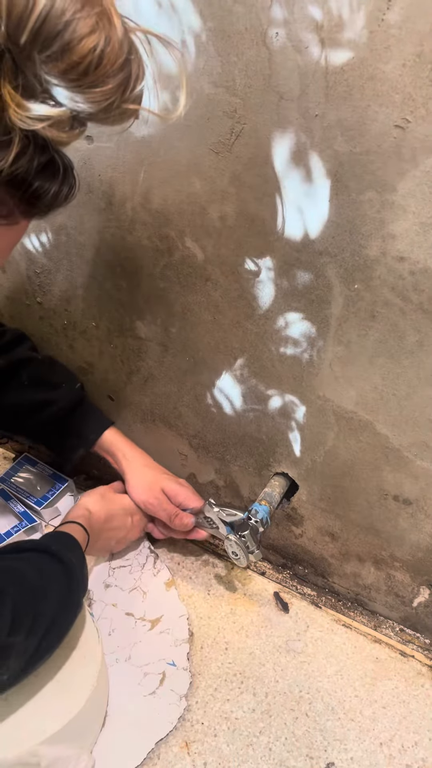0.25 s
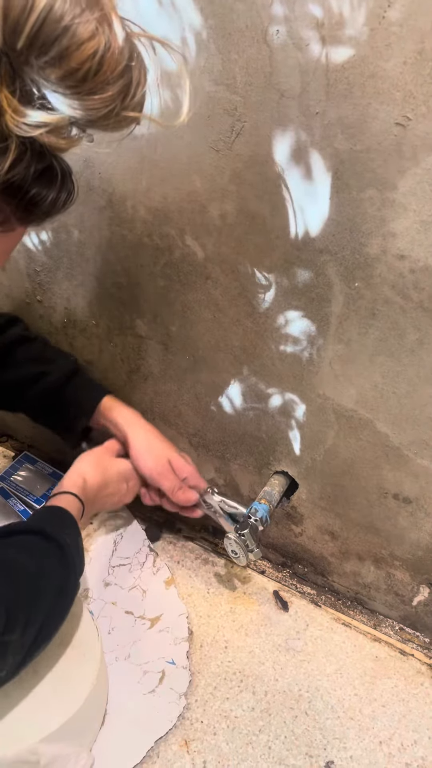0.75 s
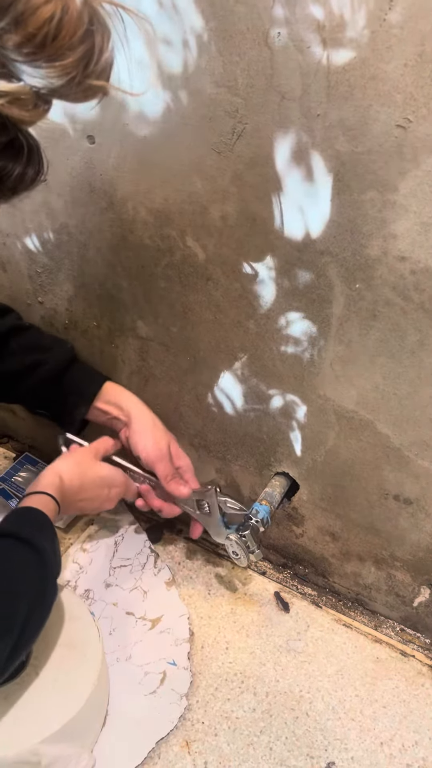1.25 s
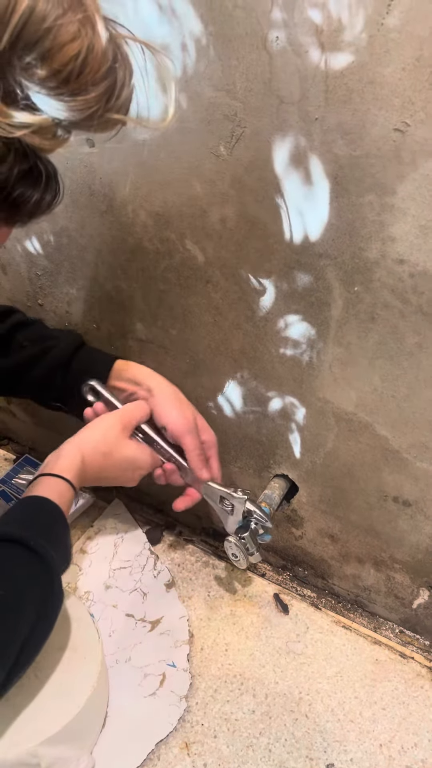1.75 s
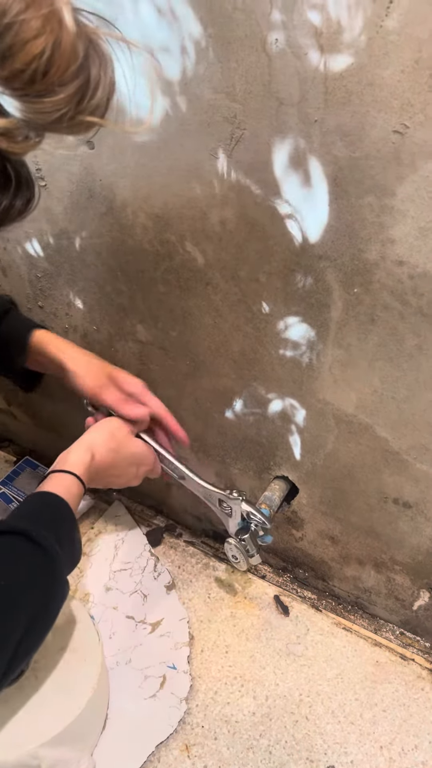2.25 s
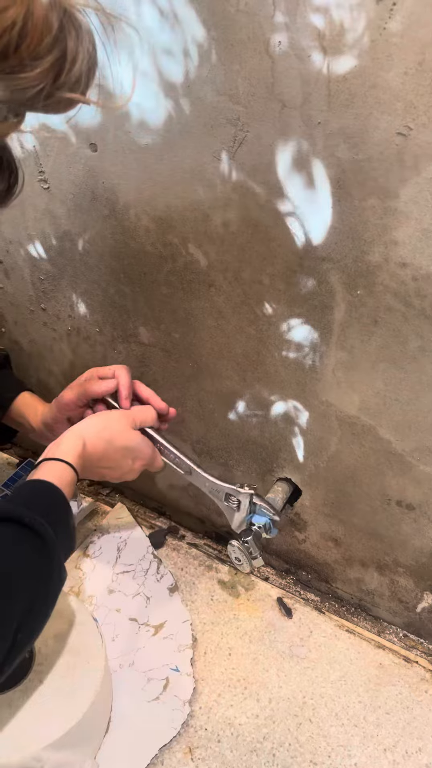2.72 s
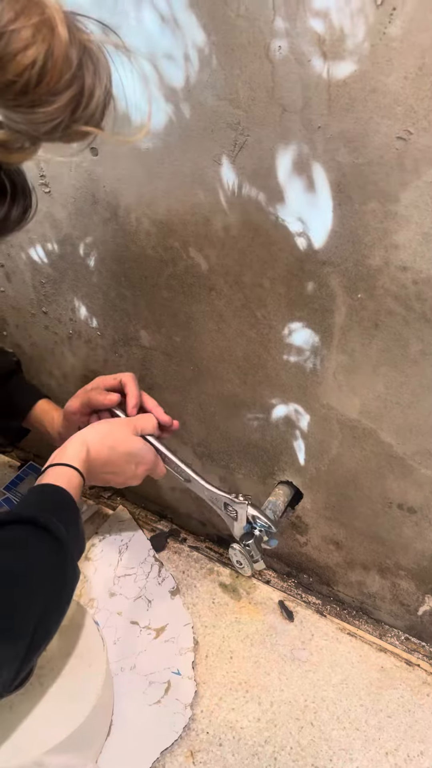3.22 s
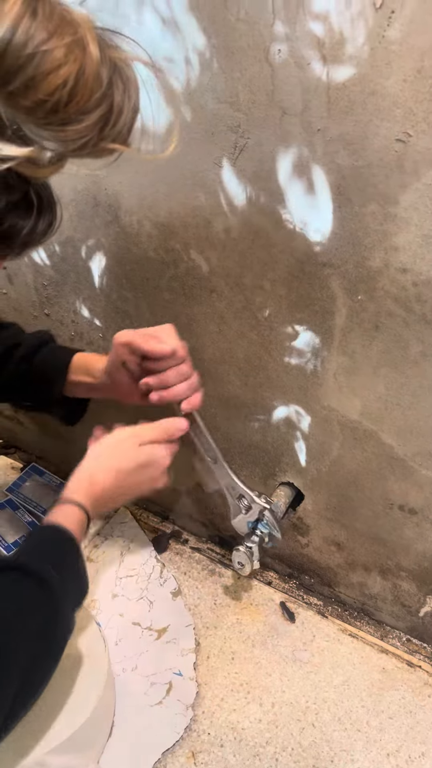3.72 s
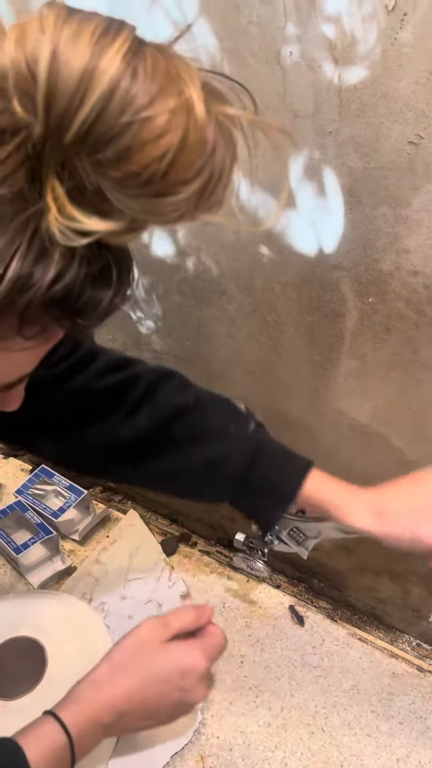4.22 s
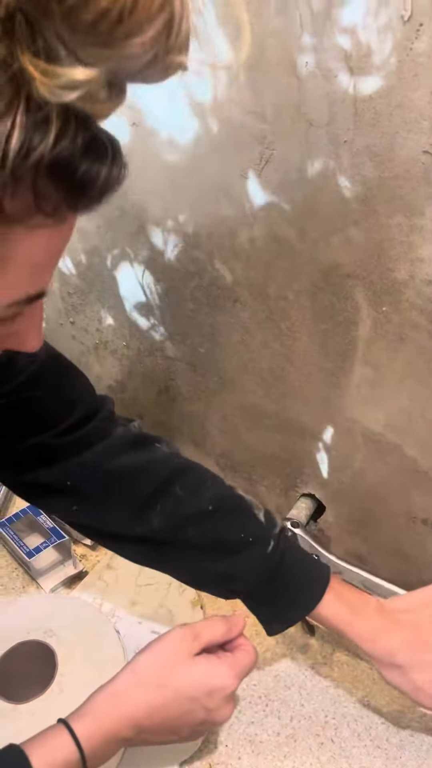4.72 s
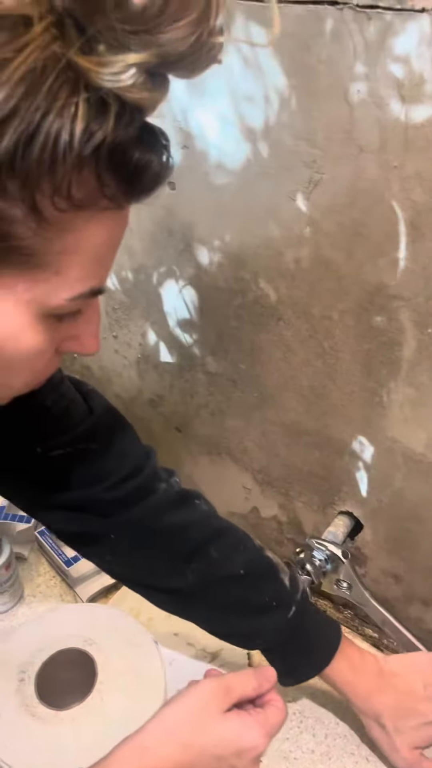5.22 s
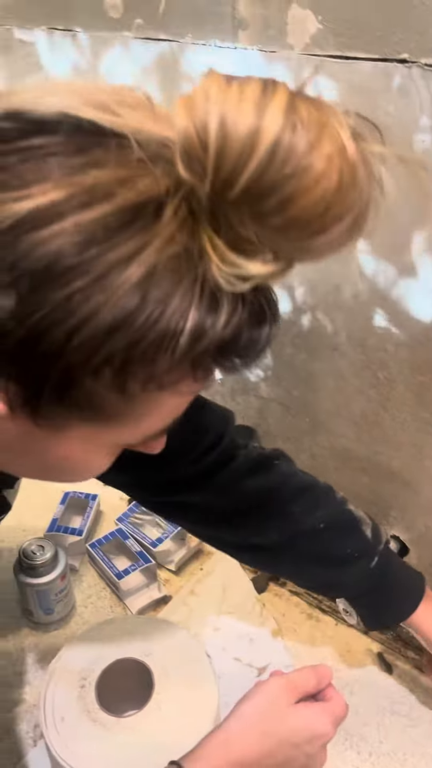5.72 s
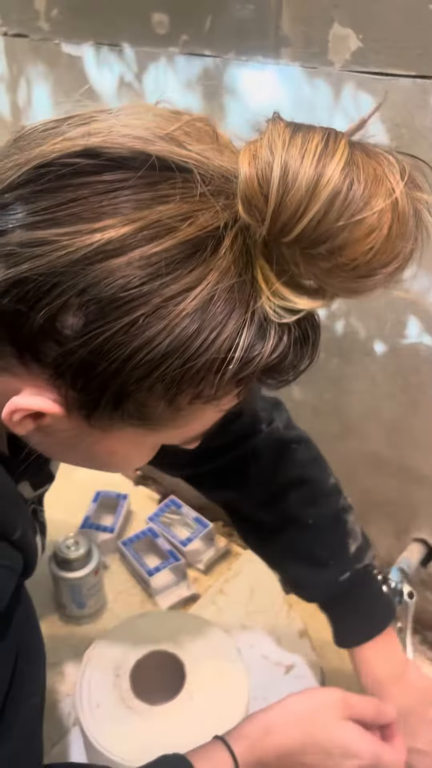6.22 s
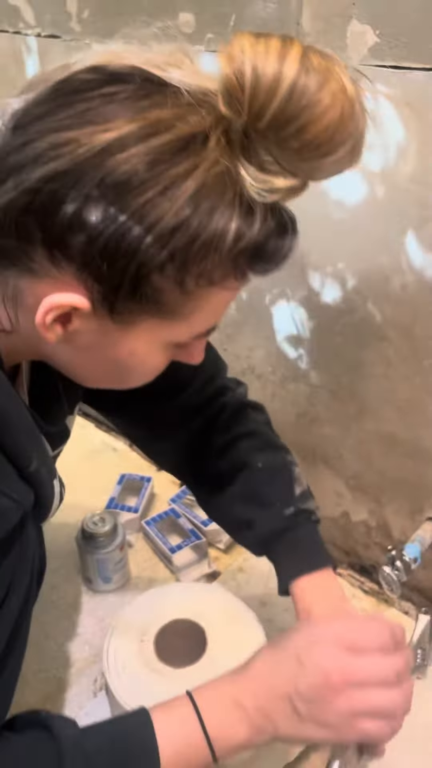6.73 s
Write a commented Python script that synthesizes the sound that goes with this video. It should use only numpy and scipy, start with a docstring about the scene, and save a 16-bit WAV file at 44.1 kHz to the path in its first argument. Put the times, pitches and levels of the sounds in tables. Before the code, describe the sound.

Steel clunks and bright rattling jangles as a wrench grips a valve, with dull pipe thuds, soft cloth rustle and fan drone behind.

```python
"""An adjustable wrench is fitted onto a valve on a pipe stub, turned and knocked free in a bare bathroom.
Each contact thuds through pipe and wall, clacks, ticks and sets metal modes ringing; noise bursts make
the blows, decaying sines the ringing. Filtered random clicks make the jaw's rubbing and the threads'
groans, gliding tones the clunks, a narrow noise band the squeak. Sleeves swish as shaped noise; a fan
adds ducted air noise and hum. Two microphone ports hear it with frequency-dependent phase and level."""
import sys
import numpy as np
from scipy import signal
from scipy.fft import rfft, irfft
from scipy.io import wavfile
from scipy.ndimage import map_coordinates

SR = 44100
rng = np.random.default_rng(int(sys.argv[2]) if len(sys.argv) > 2 else 0)


def pcm_store(signal):
    """Save signal as 16-bit PCM."""
    levels = np.round(np.clip(np.atleast_2d(signal), -1, 1) * 32767)
    wavfile.write(sys.argv[1], SR, levels.astype(np.int16).T)


N = 306936
TIME = np.arange(N) / SR  # s
BINS = np.maximum(np.arange(N // 2 + 1) * SR / N, 1)  # Hz, kept off zero for the log axis

# Fan: rush of air [f/Hz, relative density level/dB per Hz]
AIR_SPECTRUM = [(20, -27.5), (45, 4), (75, -2.5), (170, -12), (350, -15), (600, -17), (900, -24),
                (2000, -29), (3500, -34.5), (8000, -63.5), (10000, -71), (16000, -72)]
# Fan: duct resonances [f/Hz, width/Hz, boost level/dB]
DUCT_RESONANCES = [(72, 23, 13.86), (124, 30, 15.3), (244, 139, 21.5), (485, 72, 17.26), (1343, 110, 15.7),
                   (1790, 280, 6.5)]
AIR_DB = -47.5  # rms level of the air rush
# Fan: motor hum [f/Hz, rms level/dB]
MOTOR_HUM = [(119.5, -65), (258, -57.5)]

# Sleeves: arm movements [t/s at full speed, held/s, swish level/dB]
ARM_MOVES = [(.18, 0.026, -63.5), (.80, 0.054, -65.5), (2.03, 0.4, -70), (3.62, .03, -65),
             (3.80, 0.17, -68), (4.12, 0.1, -72.5), (4.46, 0.025, -65), (6.74, 0.051, -71.5)]
SWISH_RISE_DB_PER_S, SWISH_FALL_DB_PER_S = 131.5, 185
RESTING_CLOTH_DB = -79.5  # sleeves are never quite still
# Sleeves: cloth noise [f/Hz, relative density level/dB per Hz]
CLOTH_SPECTRUM = [(300, 3), (1500, 0), (2500, -0.5), (4500, 1.5), (7000, 3.5), (8500, 2.5), (10000, -23),
                  (16000, -31.5)]

# Hard knocks of steel on the valve [t/s, wall thud level/dB, thud centre f/Hz, clack level/dB,
# clack centre f/Hz, tick level/dB, crack level over the tail/dB,
# pipe ring level/dB, valve ring level/dB, jaw ring level/dB, handle ring level/dB]
STEEL_KNOCKS = [ (.450, -51, 110, -41, 1090, -55, 23, -64, -69, -57.5, -75),
                (.484, -39, 91, -52, 1610, -54, 21.5, -60.5, -72, -53, -59),
                (.493, -44, 170, -50.5, 1710, -60, 11, -59, -75, -71, -72),
                (1.256, -29, 88, -51.5, 3430, -48, 13, -48, -64, -68, -52),
                (1.300, -35, 207, -73, 600, -71, 6, -48.5, -76, -74, -78),
                (1.622, -55, 250, -58, 600, -69, -1, -60, -72.5, -73, -83),
                (1.652, -36, 220, -54.5, 850, -55, 4, -52.5, -58, -68, -72),
                (1.719, -52, 200, -77, 3200, -67.5, 10, -56.5, -57, -71.5, -83),
                (1.729, -29.5, 160, -42, 1260, -48, 16, -37, -42, -48, -42.5),
                (1.741, -50, 240, -51.5, 1290, -51.5, 25, -47, -64, -56, -61),
                (1.755, -27, 81.4, -48.5, 600, -62, 13, -28.5, -69, -48.5, -77),
                (1.775, -29, 235, -60, 550, -73, 13, -40, -66, -54, -76),
                (2.381, -42.5, 150, -57, 3300, -54.5, 12, -57, -60, -55, -67),
                (2.405, -36.5, 160, -55.5, 1300, -42.5, 9.5, -55.5, -57, -50, -61.5),
                (2.418, -34.5, 204, -46.5, 1200, -37, 20, -49, -45, -29, -49.5),
                (2.422, -33, 300, -49.5, 1090, -49.5, 16.5, -48, -47, -41, -57),
                (2.432, -31, 382, -49, 2800, -49.5, 12.5, -41.5, -49.5, -47, -65),
                (2.447, -35.5, 295.3, -64, 800, -52.5, 9.5, -46.5, -52.5, -49.5, -66),
                (2.469, -29.5, 278.9, -57.5, 700, -64.5, 10, -43, -60.5, -67.5, -77),
                (2.486, -28, 168.2, -59, 695, -71, 11.5, -43, -65.5, -70.5, -79.5),
                (2.515, -37, 180, -69, 1000, -48, 21, -56, -64, -43.5, -63.5),
                (2.555, -36.5, 172, -57.5, 3220, -38.5, 10.5, -48, -55, -32, -55.5),
                (2.572, -33.5, 222, -46, 2200, -42, 14.5, -53.5, -61, -47, -61),
                (2.597, -33, 222.7, -40.5, 1300, -37, 15.5, -49, -59, -36.5, -61.5),
                (2.602, -29.5, 115.6, -53, 3206, -34, 23, -36.5, -47, -18.5, -43.5),
                (2.607, -31, 300, -58, 800, -36, 17, -43, -56.5, -36, -48.5),
                (2.620, -35.5, 260.6, -52, 905, -45, 12, -43, -59.5, -42.5, -55),
                (2.684, -33, 236, -63.5, 696, -61.5, 14, -46, -77, -59, -72),
                (5.101, -26.5, 320, -53.5, 1850, -48, 13, -60.5, -75, -76, -71),
                (5.104, -26.5, 110, -55, 750, -57, 15, -43, -80, -85, -85.5),
                (6.377, -32.5, 211.5, -42.5, 1200, -39, 18.5, -53.5, -62.5, -55, -17),
                (6.384, -29.5, 487, -35.5, 3900, -29.5, 20, -48, -53, -34, -35),
                (6.391, -49, 180, -38, 1150, -37, 8.5, -59.5, -49.5, -37.5, -15.5),
                (6.402, -50.5, 150, -47.5, 3200, -41.5, 12.5, -57.5, -58, -37, -45),
                (6.421, -41, 297, -57, 3000, -37.5, 21, -48.5, -66.5, -51, -44.5),
                (6.482, -69, 130, -45, 2900, -58, 19.5, -63, -54, -35.5, -55),
                (6.584, -42, 258, -60, 2700, -65, 19, -67, -69, -57, -50.5)]
# Light taps of the loose jaw [t/s, clack level/dB, clack centre f/Hz, tick level/dB]
JAW_TAPS = [(1.033, -66, 4000, -67), (1.546, -80, 3300, -94), (1.908, -86, 3000, -80),
            (2.004, -83, 3000, -73.5), (2.331, -73, 600, -64), (3.127, -91.5, 3000, -80),
            (3.286, -85, 3000, -68.5), (3.342, -68, 3270, -66), (4.921, -92, 3890, -78.5),
            (5.366, -88, 4000, -71.5), (6.611, -63, 1540, -82.5), (6.681, -68.5, 1700, -68.5),
            (6.82, -72.5, 4430, -68), (6.847, -77, 2910, -78.5)]
# A tap's thud follows its clack, its rings follow its tick, and nearly all of it is crack
TAP_THUD_DB, TAP_THUD_HZ, TAP_RING_DB, TAP_CRACK_DB = 10, 149.87, -12, 16
# Soft bumps of the hand on the handle [t/s, wall thud level/dB, thud centre f/Hz]
HAND_BUMPS = [(1.104, -48.5, 118), (2.897, -37, 135), (3.129, -39, 125.5), (3.432, -37, 73),
              (3.505, -47, 71.6), (3.844, -40.5, 68.7), (3.938, -47, 69)]
# The hand cushions a bump: clack and metal lie far below its thud
BUMP_CLACK_DB, BUMP_CLACK_HZ, BUMP_METAL_DB, BUMP_PIPE_DB, BUMP_CRACK_DB = -46, 600, -54, -35, 2
# Low part of a contact, through the wall [f/Hz, relative density level/dB per Hz]
THUD_SPECTRUM = [(35, -19), (55, -6.5), (78, 14.5), (100, -9.5), (125, 7), (190, -8), (250, -3.5),
                 (380, -19), (480, -15.5), (700, -42), (1500, -54.5), (3000, -73)]
# Middle part of a contact [f/Hz, relative density level/dB per Hz]
CLACK_SPECTRUM = [(200, -1), (500, 1), (1100, -7), (1800, -4), (2400, -11), (3200, -3), (4200, -11),
                  (6000, -9.5), (9000, -29.5), (15000, -55)]
# High part of a contact [f/Hz, relative density level/dB per Hz]
TICK_SPECTRUM = [(1200, -32), (3000, -11), (4000, -12), (5000, 4.5), (6000, 1.5), (7250, 19.5),
                 (8200, 10.5), (8900, -5), (10200, -12), (11300, -22), (13500, -27), (16000, -44.5)]
# How long a contact lingers in the room [f/Hz, t60/s]
ROOM_LINGER = [(50, .42), (130, .5), (300, .5), (1000, .44), (3000, .38), (7000, .34), (10000, .16),
               (15000, .1)]
# Jolts as the jaw seats and bends the metal [t/s, level/dB, first f/Hz, last f/Hz, glide/s, t60/s]
JAW_CLUNKS = [(.450, -15.5, 2914, 1053, 0.00108, 0.024), (2.595, -23, 3600, 1200, .001, .02),
              (5.101, -19, 2660, 1730, 0.0015, 0.016), (5.102, -20, 1496, 133.8, 0.002168, 0.47),
              (6.609, -40, 1990, 1570, 0.0011, 0.048)]
# Modes of the pipe stub [f/Hz, relative level/dB, t60/s]
PIPE_MODES = [(77.5, 1, .5), (120, 2.5, .48), (236, 1, .45), (312, -3, .4), (483, -1, .34), (575, -13, .45),
              (712, -14, .85)]
# Modes of the valve body [f/Hz, relative level/dB, t60/s]
VALVE_MODES = [(1464, -5, .25), (2293, -11, .25), (2433, -11, .15), (2815, -8, .17), (3230, -6, .25),
               (3305, -3, .31), (3390, -6, .3), (3438, -3, .38), (5626, -12, .45), (6336, -10, .45),
               (7321, -5, .25), (8699, -1, .2)]
# Modes of the jaw on the valve [f/Hz, relative level/dB, t60/s]
JAW_MODES = [(3120, -21.5, .2), (4899, -9, .13), (4960, -18, .12), (5120, -20, .22), (6132, -17, .13),
             (6616, -12, .27), (6712, -14, .2), (7044, -8, .2), (7087, -3, .22), (7203, -11, .29),
             (7274, -9, .18), (7377, -2, .19), (7600, -14, .08), (7865, -10, .13), (8168, -7, .16),
             (10600, -16, .08), (12000, -21, .1), (13130, -27, .13)]
# Modes of the steel handle [f/Hz, relative level/dB, t60/s]
HANDLE_MODES = [(1108, -12, .3), (1782, -16, .08), (2582, -22.5, .35), (3015, -24, .12), (3171, -22, .3),
                (3542, -23, .22), (3722, -19, .24), (4237, -15, .1), (5722, -14, .11), (5798, -15.5, .23),
                (6550, -3, .17), (6595, -5, .24), (6671, -7, .19), (6770, -11, .16), (7195, -18, .4),
                (7811, -17, .15), (8268, -3, .15), (8298, -1, .16), (8489, -16, .12), (10050, -10, .08),
                (10300, -14, .06), (10720, -21, .07), (11760, -17, .07), (12050, -22, .08),
                (12890, -23, .06)]

# Jaw strokes on the valve [t/s at full pressure, held/s, pipe shudder level/dB, grit level/dB]
JAW_RUBS = [(.88, 0.043, -39.5, -62.5), (1.051, .14, -42.5, -69), (1.65, 0.09, -33, -56.5),
            (2.334, 0.057, -32, -65), (2.418, 0.04, -27.5, -36), (2.66, 0.056, -30.5, -63.5),
            (3.11, 0.035, -36, -79.5), (3.881, 0.11, -49, -74), (5.937, 0.027, -34, -65.5),
            (6.089, 0.032, -37.5, -66), (6.178, 0.045, -29, -56)]
# Pressure builds at the same pace in every stroke; the grit fades faster than the shudder
RUB_RISE_DB_PER_S, SHUDDER_FALL_DB_PER_S, GRIT_FALL_DB_PER_S = 285.5, 103, 193
# Pipe shaken by rubbing [f/Hz, relative density level/dB per Hz]
SHUDDER_SPECTRUM = [(35, -21.5), (75, 2.5), (135, 5), (230, -1), (350, -12.5), (560, -20), (800, -38.5),
                    (1500, -39), (3000, -72)]
# Rasp on the metal [f/Hz, relative density level/dB per Hz]
GRIT_SPECTRUM = [(300, 4.5), (700, 3.5), (1300, 6.5), (2300, -3.5), (3300, -2.5), (4500, -8), (7500, -1),
                 (9000, -20.5), (13000, -34), (16000, -42)]
# High pings [t/s, level/dB]
HIGH_PINGS = [(1.256, -36.5), (2.555, -42.5), (2.574, -30.5), (2.604, -30)]
# Modes of the high pings [f/Hz, relative level/dB, t60/s]
PING_MODES = [(9400, -11, .06), (9895, -12, .12), (10260, -6, .08), (10390, 0, .08), (10520, -7, .06)]
# Threads groaning under load [t/s at full load, held/s, level/dB, centre f/Hz]
THREAD_GROANS = [(1.652, .055, -39, 504), (1.775, 0.024, -39.5, 480), (2.439, .05, -43.5, 466),
                 (2.621, 0.036, -39.5, 472), (6.18, 0.031, -54, 857)]
GROAN_OCTAVES, GROAN_RISE_DB_PER_S, GROAN_FALL_DB_PER_S = 0.34, 496, 171
# One graze of steel on steel [t/s at full level, held/s, level/dB]
STEEL_SQUEAK = (6.581, .008, -38)
# The two microphone ports [f/Hz, phase by which left leads/rad, left minus right level/dB]
MIC_PORTS = [(50, .04, -.3), (100, .07, -.6), (200, .14, -1.3), (450, .3, -3), (800, .2, -2),
             (1400, -.2, 0), (2000, .1, 0), (3200, 1.15, 0), (3800, .6, 0), (4400, 1.5, 0), (4900, 3.1, 0),
             (5300, 5.2, 0), (5800, 6.2, 0), (6500, 6.9, 0), (7400, 7.9, 0), (8400, 9.1, 0), (9400, 10, 0),
             (10500, 10.9, 0), (11700, 12.5, 0), (13700, 12.7, 0), (14500, 15, 0)]
CUTOFF_HZ = 15800


def from_db(db):
    """Decibels to gain."""
    return 10 ** (np.asarray(db) / 20)


def rms_one(x):
    """Scale to unit rms."""
    return x / np.sqrt(np.mean(x ** 2) + 1e-20)


def at_hz(points, hz, axis=1):
    """Read a column of a table on a log-frequency axis."""
    table = np.array(points)
    return np.interp(np.log(hz), np.log(table[:, 0]), table[:, axis])


def coloured(x, spectrum_db):
    """Filter a steady signal by a spectrum in dB; rms 1."""
    return rms_one(irfft(rfft(x) * from_db(spectrum_db), N))


def drift(rate_hz):
    """Slow random wander, low-passed near rate_hz, with a spread of 1."""
    return rms_one(irfft(rfft(rng.standard_normal(N)) / (1 + (BINS / rate_hz) ** 4), N))


def grains(per_s, spread_db):
    """Random clicks of either sign, a few much larger than the rest."""
    sizes = from_db(spread_db * np.minimum(rng.exponential(1, N), 4))
    return (rng.random(N) < per_s / SR) * sizes * rng.choice([-1, 1], N)


def peak_db(boost_db, hz, width_hz):
    """Resonance boost over the frequency bins."""
    return boost_db / (1 + (2 * (BINS - hz) / width_hz) ** 2)


def strokes(rows, rise_db_per_s, fall_db_per_s):
    """Gain of overlapping strokes (t/s, held/s, level/dB): each swells, holds and dies away."""
    power = 1e-18
    for s, held_s, db in rows:
        early = np.maximum(s - TIME, 0)
        late = np.maximum(TIME - s - held_s, 0)
        level_db = db - rise_db_per_s * early - fall_db_per_s * late
        power = power + from_db(np.maximum(level_db, -160)) ** 2
    return np.sqrt(power)


def reflections(x, t60):
    """Hard walls return a dense, decaying noise tail, of about the energy of the exciting sound."""
    t = TIME[:SR // 2]
    echoes = rng.standard_normal(len(t)) * from_db(-60 * t / t60) * (t > .003)
    return signal.fftconvolve(x, echoes / np.linalg.norm(echoes))[:N]


def room(x, wet_db, t60):
    """A direct sound with its reflections."""
    return x + from_db(wet_db) * reflections(x, t60)


def fan(diffuse_db=-6, diffuse_hz=550):
    """Air rushes through duct resonances over a motor hum; its treble reaches the ports from all sides."""
    spectrum_db = at_hz(AIR_SPECTRUM, BINS)
    spectrum_db = spectrum_db + sum(peak_db(db, hz, width) for hz, width, db in DUCT_RESONANCES)
    air, scattered = (from_db(AIR_DB) * coloured(rng.standard_normal(N), spectrum_db) for _ in range(2))
    treble = signal.butter(2, diffuse_hz, "high", fs=SR, output="sos")
    side = from_db(diffuse_db) * signal.sosfilt(treble, scattered)
    hum = 0
    for hz, db in MOTOR_HUM:
        phase = 2 * np.pi * hz * TIME + drift(3.1)
        hum = hum + from_db(db) * np.sqrt(2) * np.sin(phase)
    return air + hum + side * [[1], [-1]]


def sleeves(flutter_db=1.5):
    """Cloth slides on cloth as the arms move: fluttering noise that swells with each movement."""
    moving = strokes(ARM_MOVES, SWISH_RISE_DB_PER_S, SWISH_FALL_DB_PER_S)
    swish = np.hypot(moving, from_db(RESTING_CLOTH_DB))
    cloth = coloured(rng.standard_normal(N), at_hz(CLOTH_SPECTRUM, BINS))
    return swish * from_db(flutter_db * drift(25)) * cloth


def contacts():
    """Knocks, taps and bumps together, all in the columns of a knock."""
    taps = [(s, clack + TAP_THUD_DB, TAP_THUD_HZ, clack, hz, tick, TAP_CRACK_DB,
             *[tick + TAP_RING_DB] * 4)
            for s, clack, hz, tick in JAW_TAPS]
    bumps = [(s, db, hz, db + BUMP_CLACK_DB, BUMP_CLACK_HZ, db + BUMP_METAL_DB, BUMP_CRACK_DB,
              db + BUMP_PIPE_DB, *[db + BUMP_METAL_DB] * 3)
             for s, db, hz in HAND_BUMPS]
    return STEEL_KNOCKS + taps + bumps


def contact_power(hz, thud_focus_db=7, thud_octaves=0.33, clack_focus_db=9, clack_octaves=.42,
                  bass_share=.4):
    """Power per Hz (contacts x hz); where steel touches favours a pitch, and high thuds stir little bass."""
    _, thud_db, thud_hz, clack_db, clack_hz, tick_db, *_ = np.transpose(contacts())[:, :, None]

    def near(centre, octaves):
        """Bell around a favoured pitch."""
        return np.exp(-.5 * (np.log2(hz / centre) / octaves) ** 2)

    bass_loss_db = 10 * np.log10(1 + (bass_share * thud_hz / hz) ** 4)
    thud = at_hz(THUD_SPECTRUM, hz) + thud_focus_db * near(thud_hz, thud_octaves) - bass_loss_db
    clack = at_hz(CLACK_SPECTRUM, hz) + clack_focus_db * near(clack_hz, clack_octaves)
    tick = at_hz(TICK_SPECTRUM, hz)
    power = 0
    for level_db, spectrum_db in [(thud_db, thud), (clack_db, clack), (tick_db, tick)]:
        density = from_db(spectrum_db) ** 2
        total = np.sum(density * np.gradient(hz), axis=-1, keepdims=True)
        power = power + from_db(level_db) ** 2 * density / total
    return power


def blows(crack_s=0.0022, build_cycles=0.28, early_db=2, early_s=0.049, colour_db=3.5):
    """Each contact is a short crack, then dense reflections dying band by band; the bass swells late."""
    edges = 35 * 2 ** (np.arange(28) / 3)  # third-octave bands, Hz
    centres = np.sqrt(edges[1:] * edges[:-1])
    bank = [signal.butter(2 if low < 4000 else 4, [low, high], "band", fs=SR, output="sos")
            for low, high in zip(edges, edges[1:])]
    t = TIME[:SR // 2]
    swell = 1 - np.exp(-t * centres[:, None] / build_cycles)
    tails = swell * from_db(-60 * t / at_hz(ROOM_LINGER, centres)[:, None])
    tails *= 1 + (from_db(early_db) - 1) * np.exp(-t / early_s)
    cracks = np.exp(-t / crack_s) * np.minimum(centres / 500, 1)[:, None]
    out = np.zeros(N + SR)
    for (s, *_, crack_db, _, _, _, _), power in zip(contacts(), contact_power(centres)):
        colour = from_db(colour_db * rng.standard_normal(len(bank)))
        gains = np.sqrt(power * np.diff(edges)) * colour
        white = rng.standard_normal((2, len(t)))  # neighbouring bands draw on separate noises
        at = round(s * SR)
        for k, sos in enumerate(bank):
            shape = tails[k] + from_db(crack_db) * cracks[k]
            burst = signal.sosfilt(sos, white[k % 2] * shape)
            out[at:at + len(t)] += gains[k] * np.sqrt(np.mean(shape ** 2)) * rms_one(burst)
    return out[:N]


def clunks(rise_s=0.002):
    """A bending wave runs along the metal: its treble arrives first and the pitch drops to a dying note."""
    t, out = TIME[:SR // 2], np.zeros(N + SR)
    for s, db, first_hz, last_hz, glide_s, t60 in JAW_CLUNKS:
        hz = last_hz + (first_hz - last_hz) / (1 + (t / glide_s) ** 2)
        envelope = from_db(db - 60 * t / t60) * (1 - np.exp(-t / rise_s))
        out[round(s * SR):][:len(t)] += envelope * np.sin(2 * np.pi * np.cumsum(hz) / SR)
    return room(out[:N], wet_db=-5, t60=0.27)


def ringing(modes, levels_db, vary_db):
    """Every contact strikes each mode of a metal part, a two-pole resonator, with its own strength."""
    at, out = [round(row[0] * SR) for row in contacts()], np.zeros(N)
    strengths_db = levels_db + vary_db * rng.standard_normal((len(at), len(modes)))
    for (hz, mode_db, t60), strength_db in zip(modes, strengths_db.T):
        clicks = np.full(N, 1e-18)
        clicks[at] = from_db(strength_db + mode_db)
        r, w = from_db(-60 / (t60 * SR)), 2 * np.pi * hz / SR
        mode = signal.lfilter([0, np.sin(w)], [1, -2 * r * np.cos(w), r * r], clicks)
        out = mode - out  # neighbouring modes swing opposite ways
    return out


def steel_partials(count=80, ring_db=-2, vary_db=5, t60_share=.5):
    """The steel adds brief, dense partials in the treble; they differ at each contact, so pitches change."""
    grid = np.geomspace(800, 13500, count)  # Hz
    spacing, t = np.gradient(grid), TIME[:SR // 5].astype(np.float32)
    t60 = t60_share * at_hz(ROOM_LINGER, grid)
    decay = from_db(-60 * t / t60[:, None]).astype(np.float32)
    out, axis = np.zeros(N + SR), np.geomspace(35, 16000, 200)
    for (s, *_), power in zip(contacts(), contact_power(axis)):
        pitches = (grid + spacing * rng.uniform(-.5, .5, count)).astype(np.float32)
        strengths = from_db(ring_db + vary_db * rng.standard_normal(count)) * rng.choice([-1, 1], count)
        gains = np.sqrt(np.interp(grid, axis, power) * spacing) * strengths
        partials = decay * np.sin(2 * np.pi * pitches[:, None] * t)
        out[round(s * SR):][:len(t)] += gains.astype(np.float32) @ partials
    return out[:N]


def wrench(wander_s=1.5e-5):
    """Metal parts ring in the room; the loose wrench rattles, so its notes waver in level and pitch."""
    pipe_db, valve_db, jaw_db, handle_db = np.transpose(contacts())[-4:, :, None]
    pipe = ringing(PIPE_MODES, pipe_db, vary_db=2)
    valve = ringing(VALVE_MODES, valve_db, vary_db=1.5)
    steel = ringing(JAW_MODES, jaw_db, vary_db=1.5) + ringing(HANDLE_MODES, handle_db, vary_db=1.5)
    steel = map_coordinates(steel, [(TIME + wander_s * drift(30)) * SR], order=3)
    rattle = from_db(2.2 * drift(70))
    return room(pipe + valve + rattle * steel + steel_partials() + high_pings(), wet_db=-11, t60=0.2)


def rubbing(pipe_db=4, pipe_width_hz=50):
    """Tiny slips of the jaw shake the pipe in the wall and rasp on the metal."""
    shaking = strokes([(s, held, db) for s, held, db, _ in JAW_RUBS],
                      RUB_RISE_DB_PER_S, SHUDDER_FALL_DB_PER_S)
    rasping = strokes([(s, held, db) for s, held, _, db in JAW_RUBS],
                      RUB_RISE_DB_PER_S, GRIT_FALL_DB_PER_S)
    pipe = sum(peak_db(pipe_db, hz, pipe_width_hz) for hz, _, _ in PIPE_MODES)
    slips = room(grains(per_s=900, spread_db=2.5), wet_db=0, t60=.3)
    rasp = room(grains(per_s=500, spread_db=5.5), wet_db=4, t60=.3)
    shudder = coloured(slips, at_hz(SHUDDER_SPECTRUM, BINS) + pipe)
    grit = coloured(rasp, at_hz(GRIT_SPECTRUM, BINS) + pipe)
    return shaking * shudder + rasping * grit


def high_pings():
    """Each ping sounds a cluster of high, decaying notes."""
    pings = np.zeros(N)
    t = TIME[:SR // 2]
    ping = sum(from_db(db - 60 * t / t60) * np.sin(2 * np.pi * hz * t) for hz, db, t60 in PING_MODES)
    for s, db in HIGH_PINGS:
        pings[round(s * SR):][:len(t)] += from_db(db) * ping
    return pings


def groans():
    """The threads stick and slip in quick runs, each run sounding one broad resonance of the fitting."""
    slips, out = room(grains(per_s=350, spread_db=3), wet_db=-2, t60=.2), 0
    for s, held_s, db, hz in THREAD_GROANS:
        resonance_db = -20 * np.log10(1 + (np.log2(BINS / hz) / GROAN_OCTAVES) ** 4)
        load = strokes([(s, held_s, db)], GROAN_RISE_DB_PER_S, GROAN_FALL_DB_PER_S)
        out = out + load * coloured(slips, resonance_db)
    return out


def squeak(hz=6575, width_hz=110, rise_db_per_s=1100, fall_db_per_s=330):
    """Steel grazes steel: a narrow noise band sings briefly, close to two strong handle modes."""
    note = coloured(rng.standard_normal(N), -20 * np.log10(1 + (2 * (BINS - hz) / width_hz) ** 2))
    return strokes([STEEL_SQUEAK], rise_db_per_s, fall_db_per_s) * note


def scene(scatter_db=-10, scatter_hz=400):
    """Work at the valve over the fan; side reflections reach the two ports a little differently."""
    work = sleeves() + blows() + clunks() + wrench() + rubbing() + groans() + squeak()
    band = signal.butter(2, [scatter_hz, 5000], "band", fs=SR, output="sos")
    sideways = signal.sosfilt(band, reflections(work, t60=0.11))
    return work + from_db(scatter_db) * sideways * [[1], [-1]] + fan()


def record(dry, top=0.9):
    """The ports differ in phase and level by frequency; peaks are rounded towards top, then treble is cut."""
    half = np.array([[.5], [-.5]])  # each port takes half the difference
    phase = np.exp(1j * half * at_hz(MIC_PORTS, BINS))
    ports = phase * from_db(half * at_hz(MIC_PORTS, BINS, axis=2))
    heard = irfft(rfft(dry) * ports, N)
    rounded = heard / (1 + (heard / top) ** 4) ** .25
    treble_cut = signal.cheby2(12, 60, CUTOFF_HZ + 700, fs=SR, output="sos")
    return signal.sosfilt(treble_cut, rounded)


dry = scene()
out = record(dry)
pcm_store(out)
```